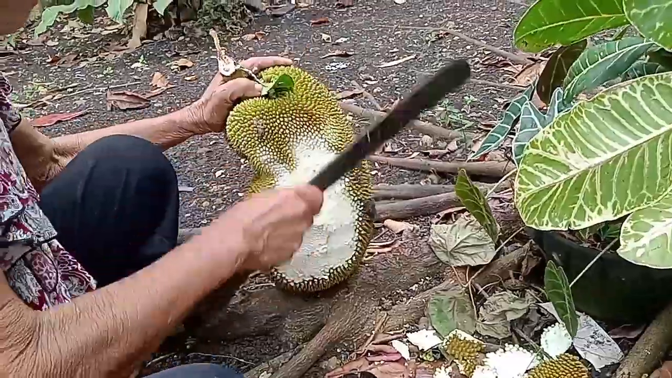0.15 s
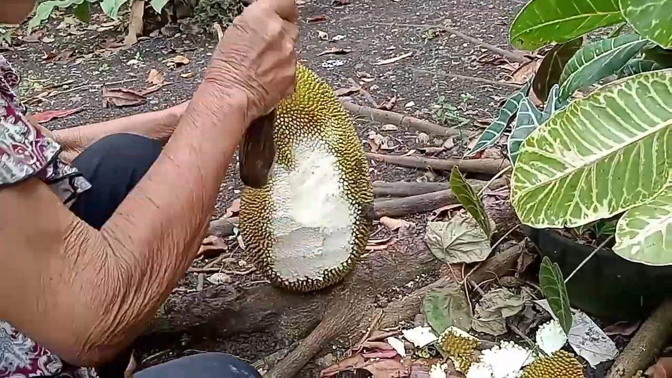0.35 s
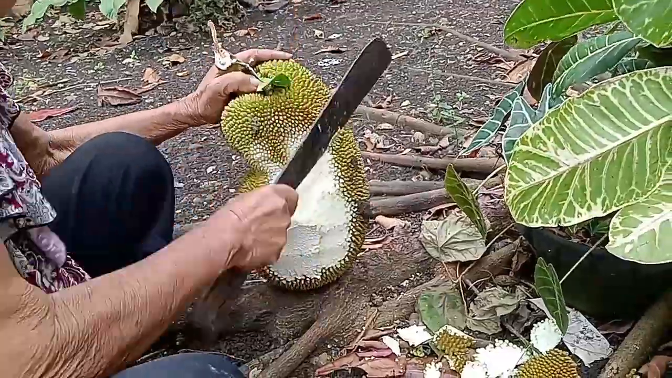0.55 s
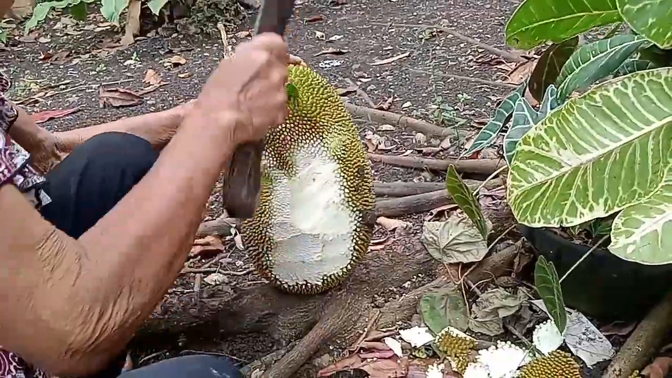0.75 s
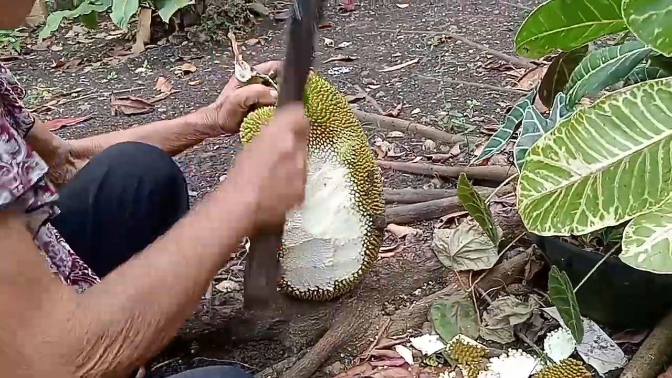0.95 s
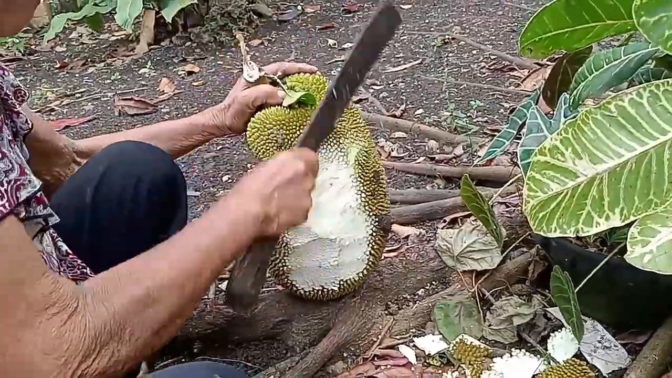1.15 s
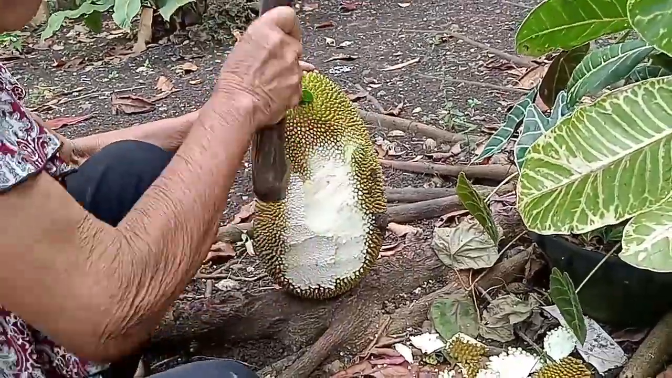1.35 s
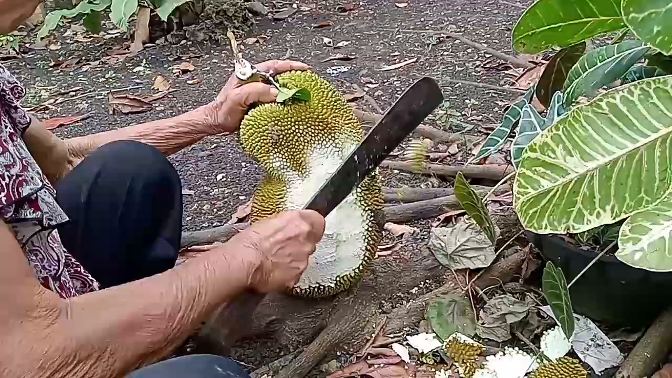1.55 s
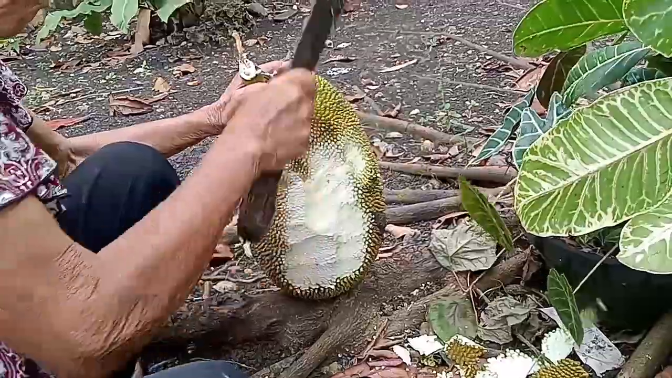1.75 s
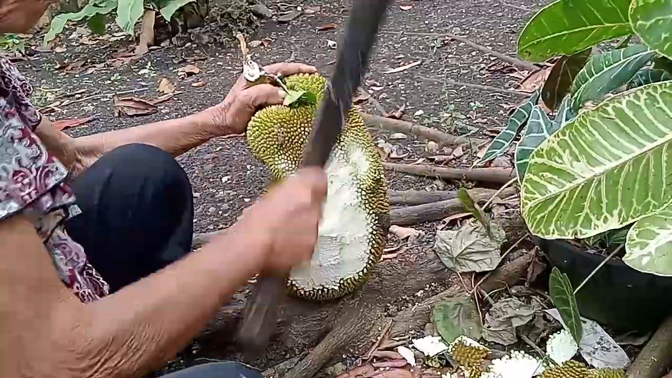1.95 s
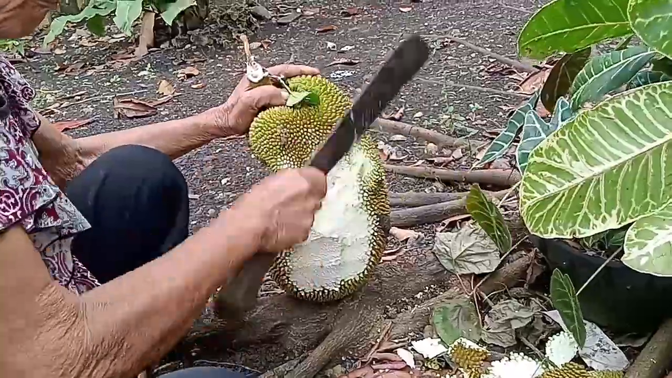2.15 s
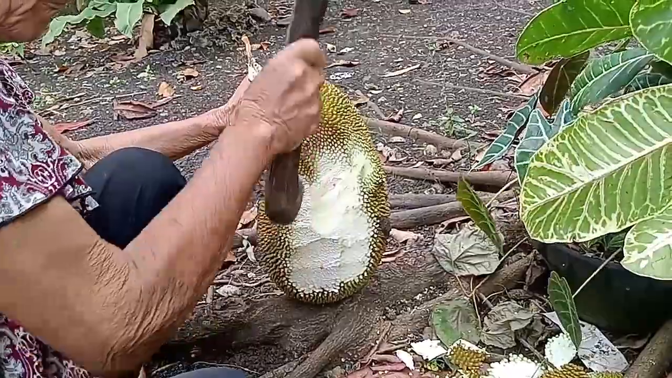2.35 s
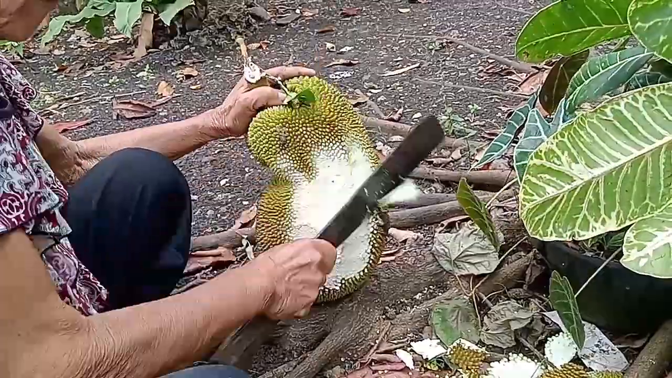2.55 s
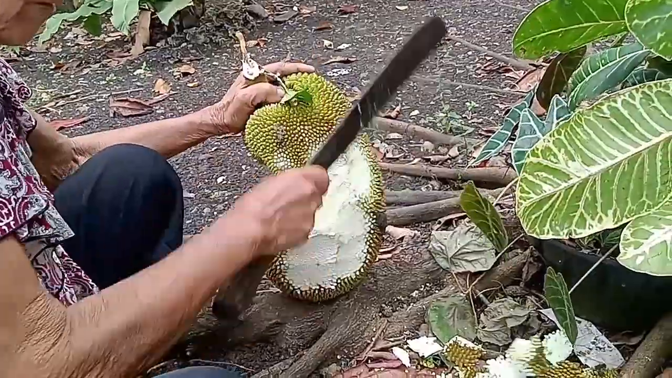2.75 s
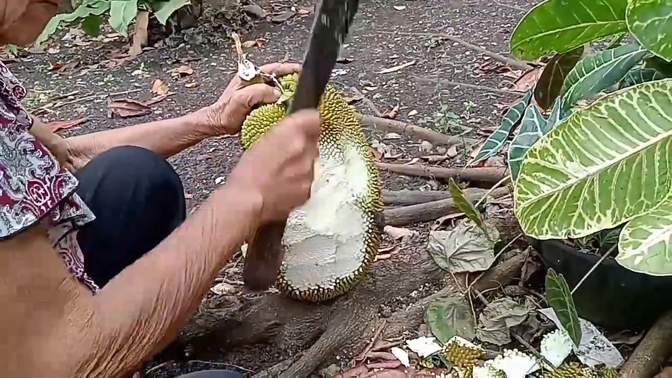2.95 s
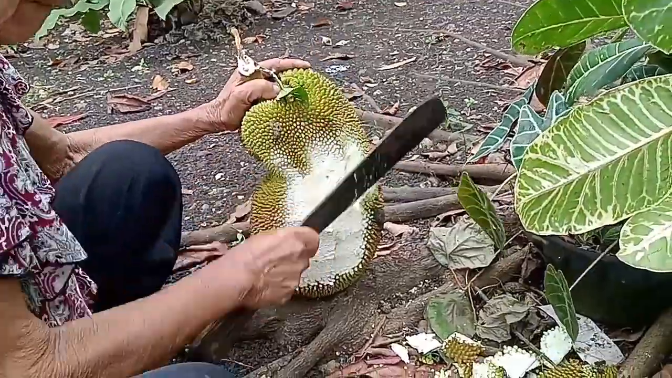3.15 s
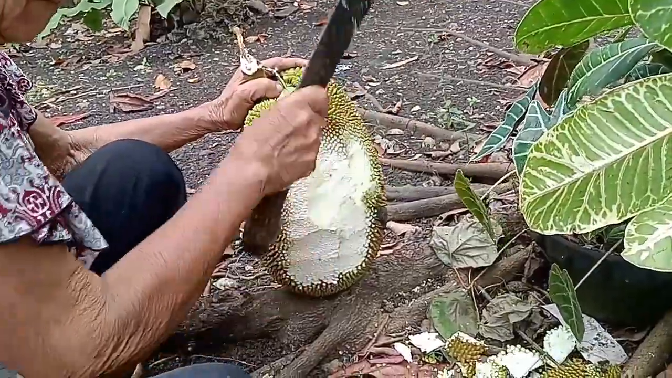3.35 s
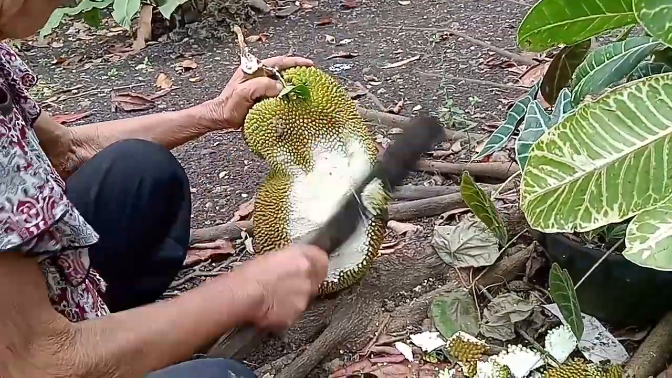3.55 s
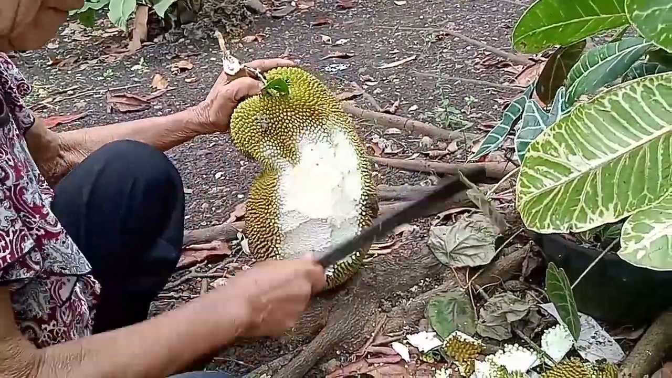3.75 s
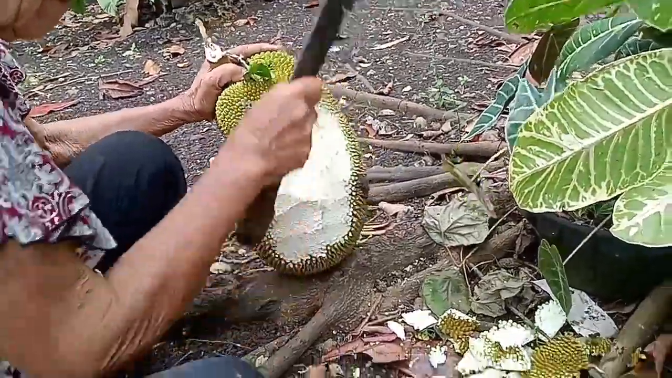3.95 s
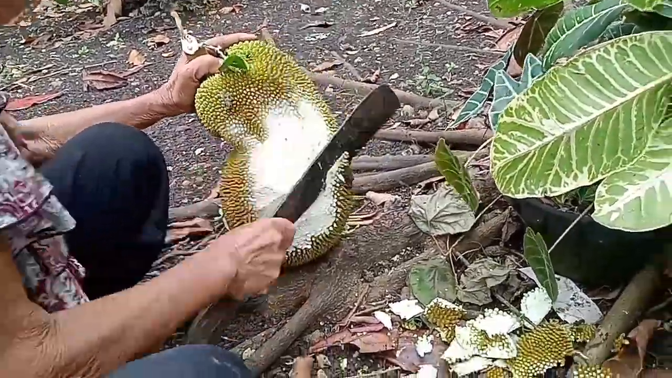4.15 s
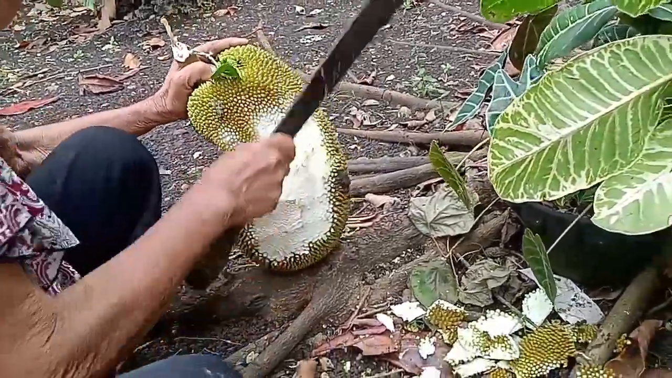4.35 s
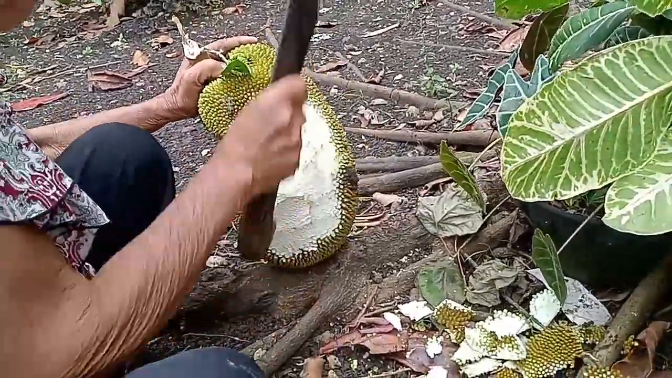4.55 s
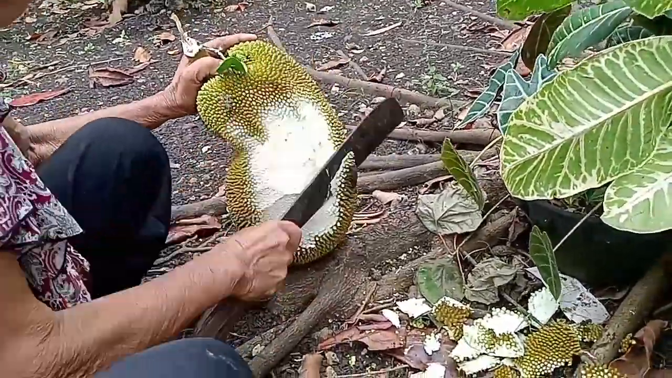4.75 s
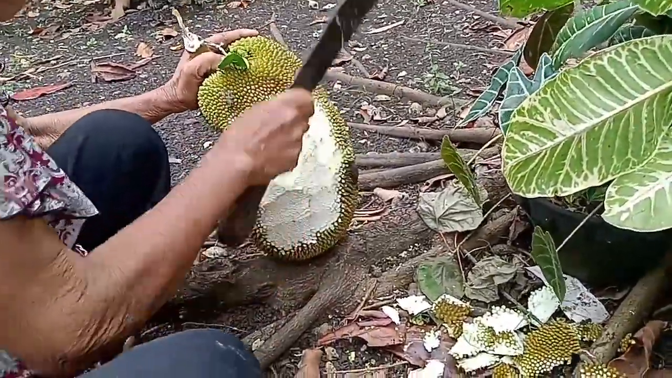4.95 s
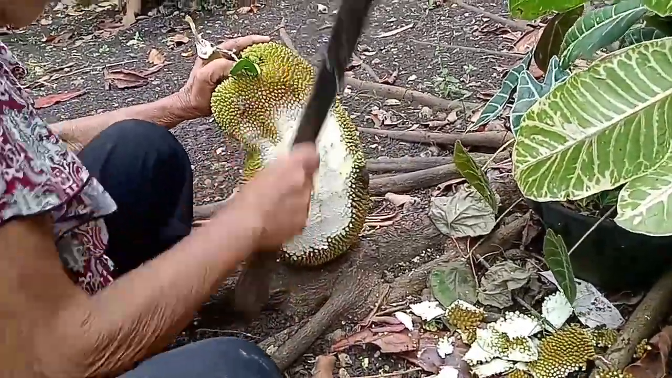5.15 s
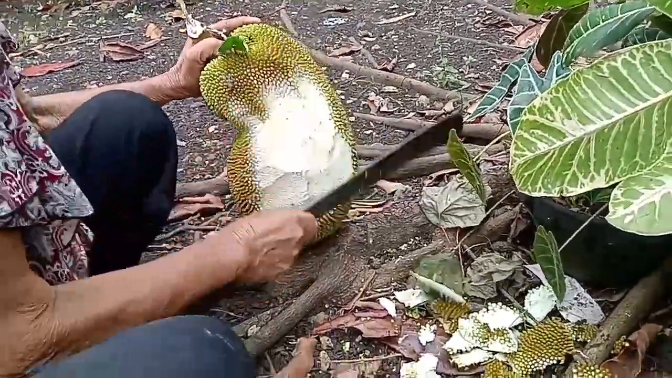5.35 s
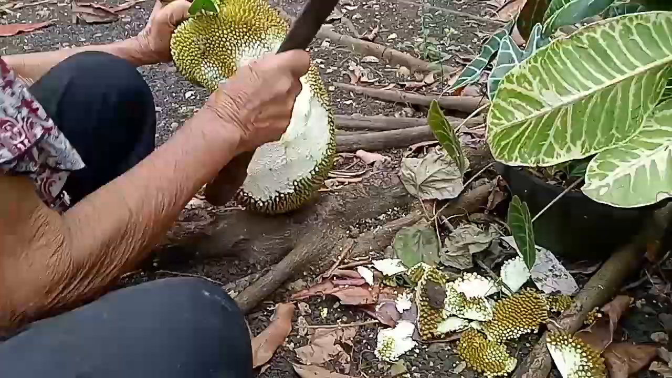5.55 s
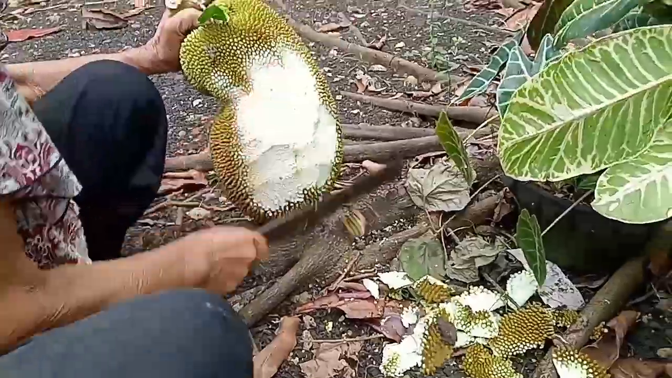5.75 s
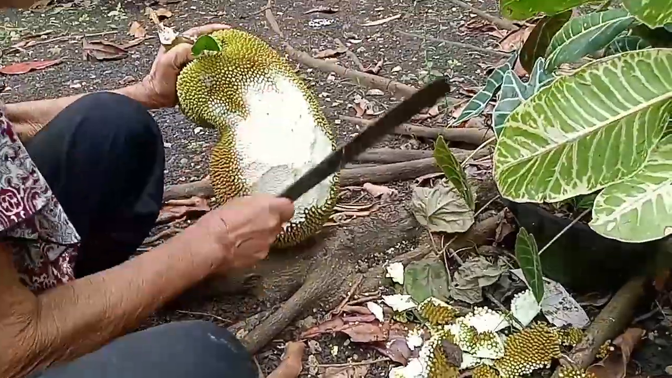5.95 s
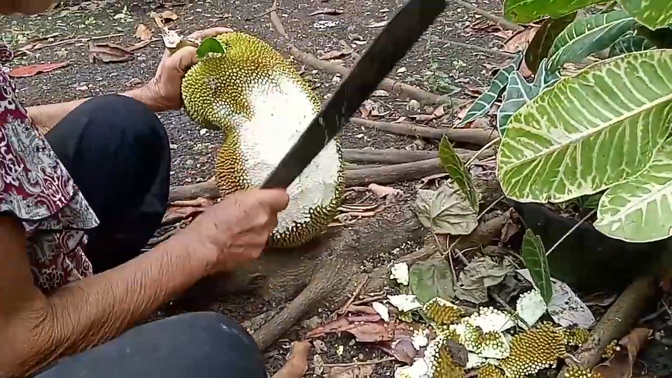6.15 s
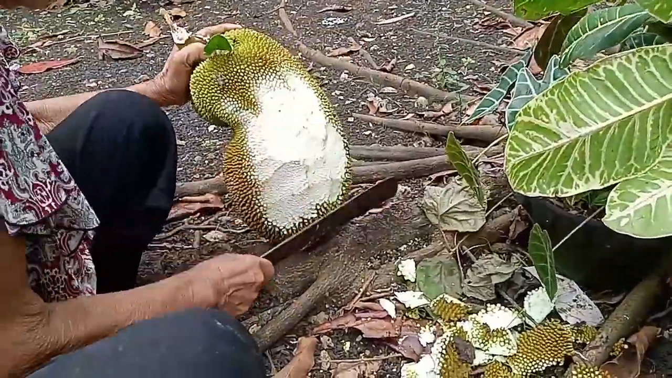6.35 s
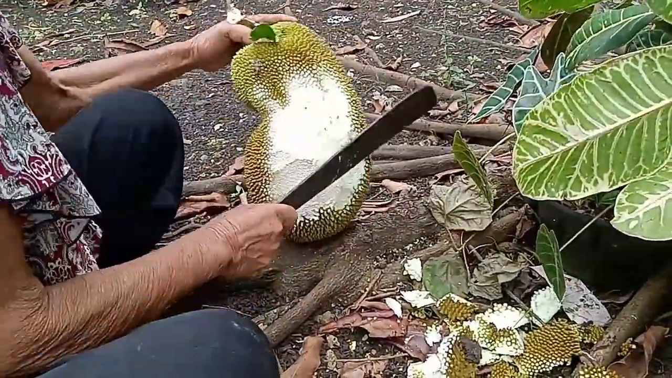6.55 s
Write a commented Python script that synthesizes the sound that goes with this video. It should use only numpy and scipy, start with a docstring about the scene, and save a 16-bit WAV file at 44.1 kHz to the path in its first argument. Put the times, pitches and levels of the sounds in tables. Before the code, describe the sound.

A heavy blade chops a large fruit about twice a second, crunchy wet strokes with dull thumps, chips pattering down and low wind buffeting.

```python
"""Outdoors, on open ground by dry leaves: a heavy blade chops the rind off a large fruit, near a one-port
microphone. Each stroke tears through fibres, shakes the fruit and rings the blade; clean blows thump the
fruit's modes. Close by, chips land as crackles with hollow tones and softer pieces rustle; plants and walls
scatter it all. Wind rumbles at the port, with short bursts of a few uneven low cycles; far off, leaves hiss in
drifting patches."""
import sys
import numpy as np
from scipy import signal
from scipy.io import wavfile
from scipy.ndimage import uniform_filter1d

SR = 44100
rng = np.random.default_rng(int(sys.argv[2]) if len(sys.argv) > 2 else 0)


def dump(signal):
    """Clip the signal to [-1, 1] and save it as 16-bit WAV at the path in sys.argv[1]."""
    limited = np.clip(np.atleast_2d(signal).T, -1, 1)
    pcm = np.round(limited * 32767).astype(np.int16)
    wavfile.write(sys.argv[1], SR, pcm)


N = 294628  # samples in the scene

# Stages of the blade tearing through the rind: start_s, tearing_db, hold_ms, fall_t60_ms,
# dullness_db_per_octave, push_into_fruit_db, height_on_fruit (0-1)
CUT_STAGES = [(.0095, -9.5, 5.6, 41, -3.5, -13, 0.53), (0.5691, -4, 6.1, 41, 0.5, -8, 0.11),
              (1.057, -15.5, 3, 100, 3, -16, 0), (1.067, -5, 3.7, 29, -0.5, -13.5, 0.33),
              (1.557, -21, 15, 47, 1.5, -38, .44), (1.568, -9, 4.8, 44, -1, -13, 0.58),
              (2.054, -16, 8.3, 66, -0.5, -17.5, .34), (2.067, -16.5, 4.1, 8.7, -4.5, -24, 0.2),
              (2.571, -29.5, 17, 88, -5, -26, 0), (2.586, -7.5, 6, 52, 0, -13.5, 1),
              (3.099, -14.5, 10.6, 62, -0.5, -16.5, 0.66), (3.612, -14, 9.8, 41, -2, -14, .58),
              (4.203, -9.5, .6, 54, -1, -9, 0.33), (4.718, -11.5, 10.1, 71, .5, -18, 1),
              (5.25, -21, 3.6, 80, 5, -19, 0.6), (5.261, -10.5, 10.4, 71, 4.5, -20.5, 0.56),
              (5.787, -8, 7.1, 38, 4.5, -21, 0.5), (5.823, -21.5, 2.2, 123, 9, -45, 0.2),
              (6.291, -14.5, 4.9, 31, 2.5, -20.5, 0.8), (6.319, -3, 0.96, 14, -1.5, -10.5, 0.3)]
# Clean blows on the fruit: start_s, level_db, height_on_fruit (0-1, higher rings the upper modes), contact_ms
CLEAN_BLOWS = [(0.009, -12, 0.5, 0.71), (0.572, -2, 0.4, 0.42), (1.557, -14.5, 0.54, 1),
               (2.055, -20, 0.1, 0.42), (2.572, -12.5, 0.73, 1), (3.612, -13, 1, 1), (4.207, 2, 0.5, 0.59),
               (5.257, -20, 0.84, 0.27), (5.828, 2, 0, 0.74), (6.3216, -1, 0.46, 0.43)]
# Modes of the fruit, struck freely: pitch_hz, level_db, t60_s
FRUIT_MODES = [(480, 0, .025), (740, -6, .06), (1065, -6, .03), (1420, -7, .03), (1670, -12, .04)]
# Modes of the blade: pitch_hz, level_db, t60_s
BLADE_MODES = [(3120, -5, .03), (4300, -5, .04), (5600, 0, .045), (7250, -5, .03)]
# Colour of tearing fibres, relative: frequency_hz, level_db (per Hz)
TEAR_COLOUR = [(200, -25), (600, 5), (1500, 8.5), (2500, 8.5), (3200, 13.5), (6000, 11.5), (9000, 10.5),
               (16000, 20)]
# Colour of flying juice and crumbs, relative: frequency_hz, level_db (per Hz)
SPIT_COLOUR = [(500, -29), (1500, -8), (4000, -6), (9000, -8.5), (16000, -18.5)]
# Chips of rind and stirred leaves: start_s, tone_peak_db, pitch_hz, edge_db (bright edge relative to the tones)
CHIP_FALLS = [(.1209, -25, 4910, -22), (.131, -39, 5200, -6), (.7735, -25.5, 1670, -8),
              (.7967, -26, 1430, -9), (.8914, -29, 1490, -7.5), (1.0073, -23, 1780, -11),
              (1.1336, -28, 2500, -22), (1.269, -35, 1070, -21), (1.3734, -35, 2870, -19),
              (1.812, -35.5, 5140, -29), (2.164, -50, 1720, 14), (2.2653, -36, 4000, -24),
              (2.3345, -24.5, 1990, -30), (2.7138, -31, 1460, 2), (2.7616, -27, 3370, -5),
              (2.77, -33, 2790, -18), (2.7804, -32, 2200, -13), (2.803, -31.5, 1680, -6),
              (2.9277, -42, 3300, 10.5), (3.2257, -35.5, 1600, 0.5), (3.6536, -27.5, 4830, -18),
              (3.671, -47, 6500, 6), (3.699, -32, 2070, 5), (3.7476, -32.5, 1520, -24),
              (3.7673, -32, 1560, -7), (4.2655, -34.5, 1670, -13), (4.2888, -33.5, 2450, -3),
              (4.342, -33.5, 3780, -17), (4.3748, -15.5, 3150, -33), (4.4906, -35, 1280, -26),
              (4.53, -35, 1190, -18), (4.9537, -36, 2060, -29), (5.373, -33, 2090, -4),
              (5.3999, -21.5, 1720, -9), (5.4134, -31, 1640, -14), (5.4227, -29, 5840, -31),
              (5.5393, -38, 5000, -5), (6.6243, -34.5, 4300, -2)]
# Soft rustles of falling rind and shifting cloth: start_s, length_s, pitch_hz, level_db
SOFT_RUSTLES = [(0.77, 0.095, 1560, -46.5), (1.14, .21, 1710, -49.5), (2.33, 0.015, 2480, -44.5),
                (2.762, 0.043, 2460, -48), (3.749, .043, 1550, -48), (4.484, 0.096, 1240, -49.5),
                (4.922, 0.11, 2450, -49.5), (5.38, .06, 1660, -39), (5.4, 0.055, 5400, -44),
                (5.402, .28, 5700, -52.5), (5.674, 0.053, 4300, -54.5)]
# Scatter from plants and walls: frequency_hz, t60_s
YARD_DECAY = [(300, 0.21), (1000, 0.15), (3000, 0.23), (8000, 0.2)]
# Course of the wind rumble: time_s, level_db
WIND_COURSE = [(0, -37.5), (.7, -33), (1.77, -42.5), (2.0, -41.5), (2.75, -35.5), (3.16, -47.5),
               (3.45, -39.5), (4.0, -38.5), (4.6, -42.5), (5.17, -37.5), (5.6, -35), (5.8, -27.5),
               (6.1, -41), (6.68, -39)]
# Colour of the wind rumble, relative: frequency_hz, level_db (per Hz)
RUMBLE_COLOUR = [(25, -37), (50, -1), (75, 7), (100, 4), (150, 3), (200, -5.5), (300, -10.5), (400, -20.5),
                 (600, -48)]
# Short low bursts in the wind: start_s, level_db, pitch_hz
WIND_BUFFETS = [(0.137, -16.5, 197), (0.175, -17.5, 93.7), (0.194, -27, 130), (0.428, -24, 119.4),
                (.481, -18, 104.4), (0.559, -11.5, 94.3), (.717, -16.5, 88.3), (1.788, -29.5, 109.5),
                (2.388, -25, 94), (2.429, -19, 91.2), (3.402, -17.5, 86), (3.852, -14.5, 101),
                (4.015, -22.5, 78.7), (4.755, -19.5, 113.5), (4.822, -23, 94), (5.138, -17.5, 100.6),
                (5.379, -18, 133.4), (5.459, -11, 145), (5.521, -16, 74), (5.6, -16, 88),
                (5.652, -11, 98.3), (5.72, 0, 121), (5.766, -3.5, 108.6), (5.882, -4.5, 135.4),
                (5.907, -10, 125), (5.937, -17, 199), (6.016, -24.5, 185), (6.042, -13, 91.6),
                (6.069, -23.5, 164), (6.141, -28, 149), (6.165, -25.5, 183), (6.281, -19.5, 74.4),
                (6.552, -16.5, 120), (6.581, -14, 150)]
# Colour of the far hiss, relative: frequency_hz, level_db (per Hz)
AIR_COLOUR = [(100, -51), (300, 4.5), (600, 2), (1700, 2), (2440, -4), (4500, -5.5), (6500, -11),
              (9000, -19), (16000, -11.5)]
# Response of the microphone and its port: frequency_hz, gain_db
PORT_RESPONSE = [(20, -13), (60, -6.5), (6800, 4.5), (8350, 12), (8900, 4.5), (9700, -5.5), (10500, -16),
                 (12600, -29.5), (16000, -58)]

BITE_MS, BLADE_RING_DB = 4.75, -22  # the blade sinks in this fast and rings this far under the tearing
SCUFFLE_S = 0.046  # t60 of a chip settling
BUFFET_TURNS = 11.5  # the fall of a buffet by 60 dB, in cycles of its pitch
AIR_DB = -52  # far hiss before its swells
EDGE_HZ = 15900  # corner of the final low-pass


def chopping():
    """Snapping fibres hiss, shake the fruit and ring the blade; clean blows thump the fruit."""
    out, thud = np.zeros(N), np.zeros(N)
    t_ms = np.arange(SR // 8) / SR * 1000
    # fibres give way in clumps, each clump with its own colour
    snaps = patchy(5, 3, patch_db=3.0, points=TEAR_COLOUR) * gain_of(2.0 * drift(hz=507))
    jolts = rng.standard_normal(N) * gain_of(5.54 * drift(hz=372))
    spits = evened(patchy(6, 3, patch_db=6.5, points=SPIT_COLOUR) * gain_of(0.77 * drift(hz=120)))

    for s, db, hold, fall, dull_db, push_db, height in CUT_STAGES:
        bite = np.clip(t_ms / BITE_MS, 0, 1) ** 2
        force = bite * gain_of(-60 * np.maximum(t_ms - BITE_MS - hold, 0) / fall)
        at = slice(round(s * SR), round(s * SR) + len(t_ms))
        tilt = [(hz, -dull_db * np.log2(hz / 4000)) for hz in (500, 16000)]
        # juice and crumbs fly off
        spatter = gain_of(-27.5 - 60 * t_ms / 220) * np.clip(t_ms / (BITE_MS + hold), 0, 1)
        tearing = alike(force * snaps[at], force) + spatter * spits[at]
        add(out, s, gain_of(db) * coloured(tearing, tilt))

        # the buried blade damps the fruit and shifts its modes a little
        count = len(FRUIT_MODES)
        shift = 1 + 0.1 * rng.standard_normal(count)
        gripped = np.array(FRUIT_MODES) * np.c_[shift, np.ones(count), np.full(count, 0.4)]
        shake = signal.fftconvolve(force * jolts[at], ring(gripped, height))
        add(thud, s, gain_of(push_db) * alike(shake, force))
        blade = signal.fftconvolve(force * jolts[at], ring(BLADE_MODES))
        add(out, s, gain_of(db + BLADE_RING_DB) * alike(blade, force))

    for s, db, height, contact in CLEAN_BLOWS:
        push = np.sin(np.pi * np.clip(t_ms[:200] / max(contact, 0.1), 0, 1)) ** 2
        thump = np.convolve(ring(FRUIT_MODES, height), push)
        add(thud, s, -gain_of(db) * thump / abs(thump).max())
    # the thuds carry no deep bass
    return out + signal.sosfilt(signal.butter(3, 280, "high", fs=SR, output="sos"), thud)


def chips():
    """Each is a crisp crackle with a few hollow tones and a bright edge; many faint ones fall by chance."""
    out, t = np.zeros(N), np.arange(SR // 8) / SR
    faint = [(a * N / SR, -52 + 8 * b, 1200 * 4 ** c, -12 * d) for a, b, c, d in rng.random((50, 4))]
    rows = list(CHIP_FALLS) + faint
    noises = rng.standard_normal((len(rows), len(t)))
    chances = rng.random((len(rows), 2))
    # a sharp first contact, then a weaker scuffle
    contact = gain_of(-60 * t / 0.0086)
    scuffle = gain_of(-3.5 - 60 * t / SCUFFLE_S)
    shape = np.clip(t / 0.00068, 0, 1) * (contact + scuffle)
    for (s, db, hz, edge_db), noise, (a, b) in zip(rows, noises, chances):
        crackle = noise * shape
        t60 = 12.0 / hz
        modes = [(hz, 0, t60), ((1.35 + 0.3 * a) * hz, -4, t60), ((0.55 + 0.2 * b) * hz, -8, t60)]
        # a small soft piece excites little above its tones
        soft = np.convolve(crackle, np.hanning(round(SR / hz / 2) + 3))
        tone = signal.fftconvolve(np.diff(soft), ring(modes))[:len(t)]
        edge = coloured(crackle, SPIT_COLOUR)
        add(out, s, gain_of(db) * (tone / abs(tone).max() + gain_of(edge_db) * edge / abs(edge).max()))
    return out


def rustles():
    """Grainy noise around one broad pitch, swelling and fading."""
    out = np.zeros(N)
    grain = evened(patchy(3, 4, patch_db=4.0, points=TEAR_COLOUR) * gain_of(2.5 * drift(hz=150)))
    for s, length, hz, db in SOFT_RUSTLES:
        part = grain[round(s * SR):round((s + length) * SR)]
        hump = [(hz / 3, -30), (hz / 1.4, -5), (hz, 0), (hz * 1.5, -6), (hz * 4, -14)]
        part = evened(coloured(part, hump))
        add(out, s, gain_of(db) * part * signal.windows.tukey(len(part), 0.6))
    return out


def yard(x):
    """Diffuse scatter from plants and walls, each band dying at its own speed; three tails take turns."""
    out, turn = np.zeros(N), np.arange(N) / SR * 1.3
    for k in range(3):
        hz, t, z = signal.stft(rng.standard_normal(SR // 2), SR, nperseg=128)
        decay = gain_of(-60 * t / read(YARD_DECAY, hz)[:, None])
        tail = signal.istft(z * decay, SR, nperseg=128)[1]
        tail[:400] *= np.linspace(0, 1, 400)
        share = np.sqrt(2 / 3) * np.cos(np.pi * (turn + k / 3))
        out += signal.fftconvolve(x * share, tail / np.linalg.norm(tail))[:N]
    return out


def wind():
    """Wind on the port: a lumpy rumble, and short bursts of a few uneven low cycles."""
    s, db = np.transpose(WIND_COURSE)
    lumpy = rng.standard_normal(N) * gain_of(0.81 * drift(hz=12.0))
    out = evened(coloured(lumpy, RUMBLE_COLOUR))
    out *= gain_of(np.interp(np.arange(N) / SR, s, db))

    t = np.arange(SR // 3) / SR
    for (s, db, hz), (a, b) in zip(WIND_BUFFETS, rng.random((len(WIND_BUFFETS), 2))):
        # the cycles are a little uneven
        turns = hz * t + 0.13 * np.sin(2 * np.pi * (0.353 * hz * t + a)) + b
        swing = np.sin(2 * np.pi * turns)
        swing += 0.22 * np.sin(4 * np.pi * turns + 6 * a)
        swing += 0.032 * np.sin(6 * np.pi * turns + 6 * b)
        rise = np.clip(t / 0.0098, 0, 1) ** 2
        fall = gain_of(-60 * np.maximum(t - 0.018, 0) * hz / BUFFET_TURNS)
        add(out, s, gain_of(db) * rise * fall * swing)
    return out


def air():
    """Far hiss of leaves, in narrow drifting patches."""
    swell_db = 0.8 * drift(hz=1)
    swell_db = swell_db + 5.4 * np.exp(-np.arange(N) / SR / 0.74)  # the breeze in the leaves eases off
    return gain_of(AIR_DB + swell_db) * patchy(3, 14, patch_db=4.0, points=AIR_COLOUR)


def scene():
    """Close chopping and falling bits, their scatter, wind and far air all reach one port."""
    cut = chopping()
    bits = chips() + rustles()
    scatter = yard(gain_of(-19.5) * cut + gain_of(-12) * bits)
    mono = cut + bits + scatter + wind() + air()
    return np.array([mono, mono])


def record(dry):
    """Microphone resonance and roll-off, hard overload at full scale; then a plain low-pass."""
    heard = np.clip(coloured(dry[0], PORT_RESPONSE), -1, 1)
    low_pass = signal.firwin(511, EDGE_HZ, window=("kaiser", 9), fs=SR)
    out = signal.oaconvolve(heard, low_pass, "same")
    return np.clip([out, out], -1, 1)


def ring(modes, height=0.22):
    """Impulse response of a struck body: decaying sines; a higher blow favours the upper modes."""
    t = np.arange(SR // 8) / SR
    lean_db = 14 * (height - 0.5)  # per octave above the first mode
    return sum(gain_of(db + lean_db * np.log2(hz / modes[0][0]) - 60 * t / t60) * np.sin(2 * np.pi * hz * t)
               for hz, db, t60 in modes)


def patchy(wide, long, patch_db, points):
    """Noise of rms 1 whose level drifts in patches, wide in 86 Hz bins and long in 3 ms frames."""
    frames, hz = N // 128 + 5, np.fft.rfftfreq(512, 1 / SR)
    a, b, patches = rng.standard_normal((frames, 257, 3)).T
    patches = uniform_filter1d(patches, wide, axis=0)
    patches = evened(uniform_filter1d(patches, long, axis=1))
    z = (a + 1j * b) * gain_of(read(points, hz)[:, None] + patch_db * patches)
    return evened(signal.istft(z, nperseg=512, noverlap=384)[1][:N])


def drift(hz):
    """Random level course of rms 1: white noise low-passed at hz."""
    return evened(signal.sosfilt(signal.butter(2, hz, fs=SR, output="sos"), rng.standard_normal(N)))


def coloured(x, points):
    """Causal filter with the given gain curve."""
    log_gain = np.log(gain_of(read(points, abs(np.fft.fftfreq(8192, 1 / SR)))))
    taps = np.fft.ifft(np.exp(np.conj(signal.hilbert(log_gain)))).real[:3000]
    return signal.oaconvolve(x, taps)[..., :len(x)]


def read(points, hz):
    """Reads a table on a log-frequency axis."""
    f, value = np.transpose(points)
    return np.interp(np.log(hz + 1), np.log(f + 1), value)


def add(mix, s, sound):
    """Mixes a sound in at s seconds."""
    part = mix[round(s * SR):][:len(sound)]
    part += sound[:len(part)]


def gain_of(db):
    """Decibels to gain."""
    return 10 ** (np.asarray(db) / 20)


def evened(x):
    """Scales to rms 1."""
    return x / np.sqrt(np.mean(x ** 2) + 1e-20)


def alike(x, like):
    """Gives x the energy of like."""
    return x * np.linalg.norm(like) / np.linalg.norm(x)


dry = scene()
out = record(dry)
dump(out)
```